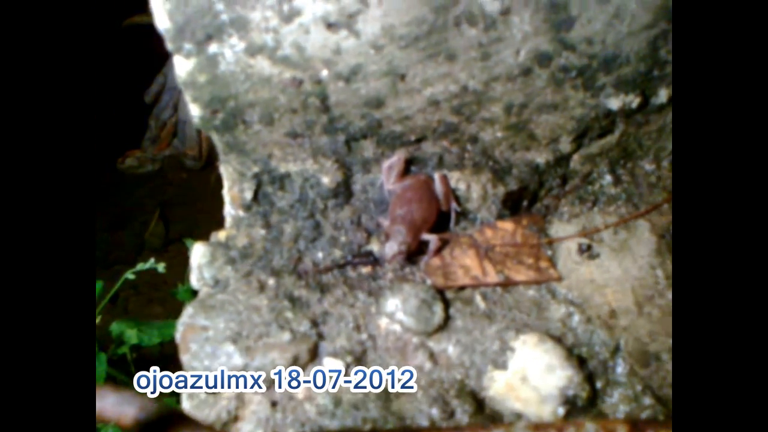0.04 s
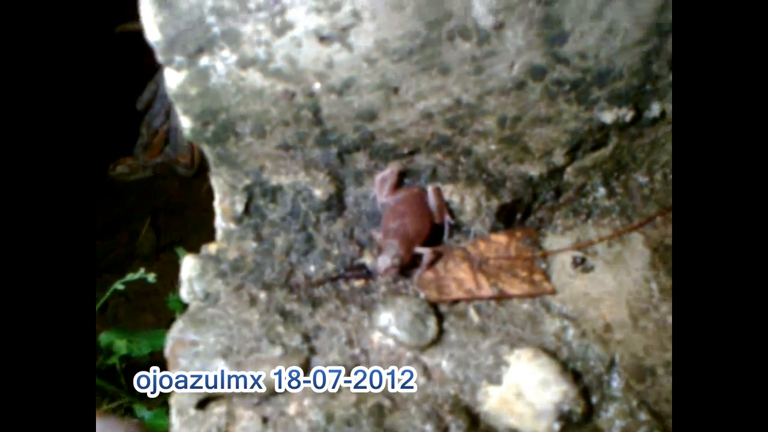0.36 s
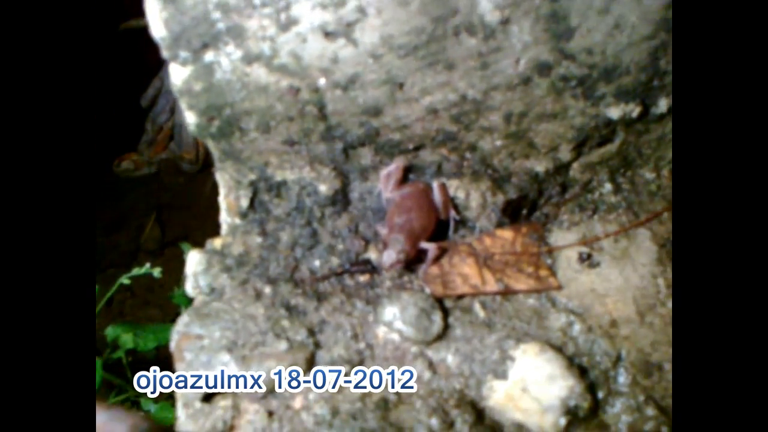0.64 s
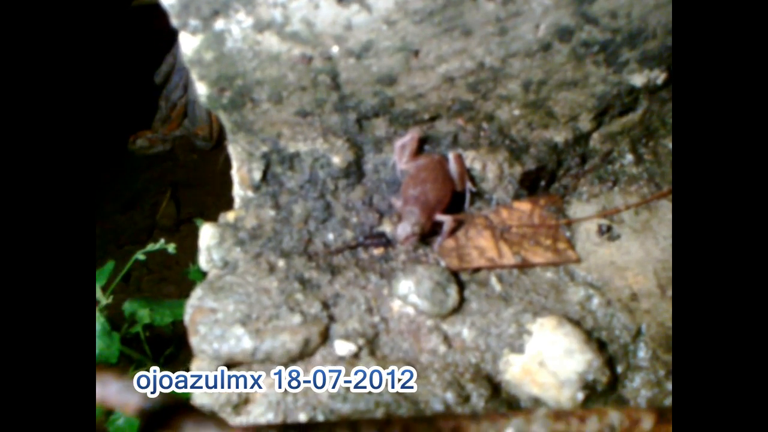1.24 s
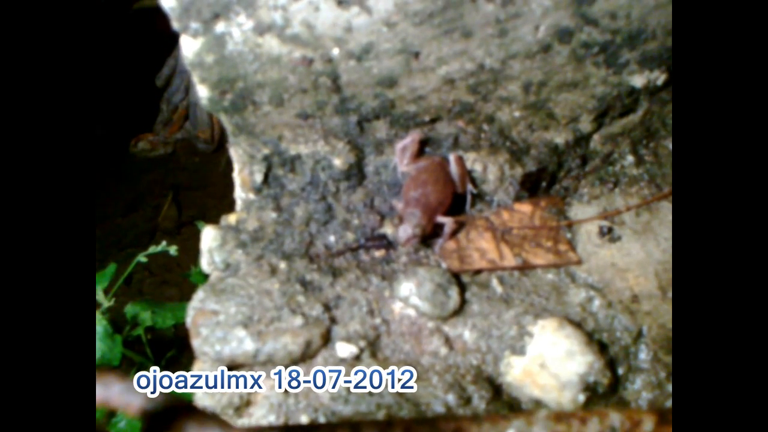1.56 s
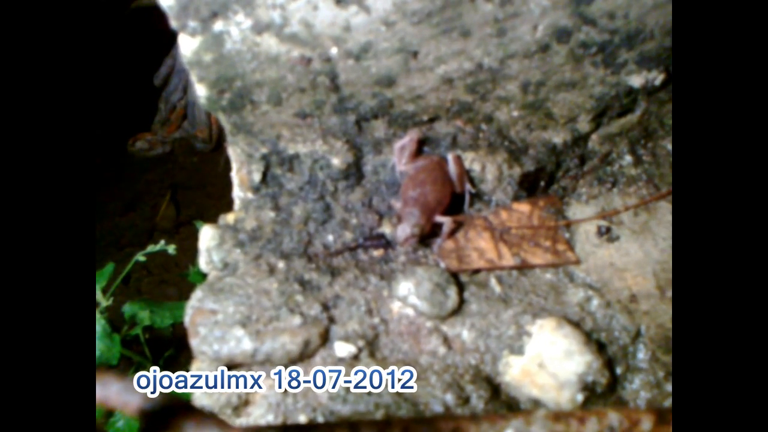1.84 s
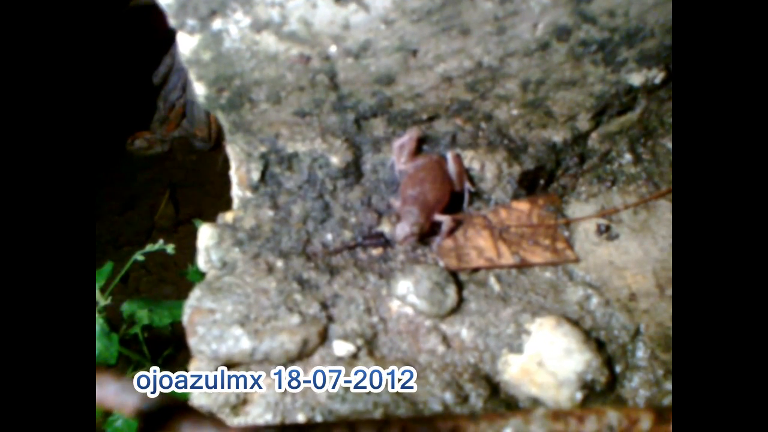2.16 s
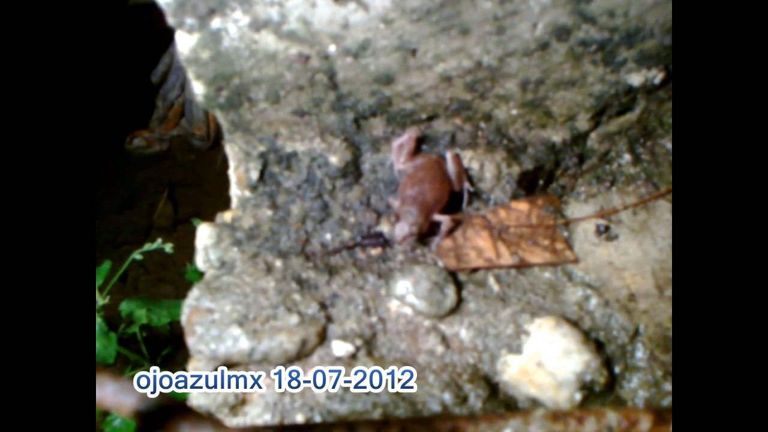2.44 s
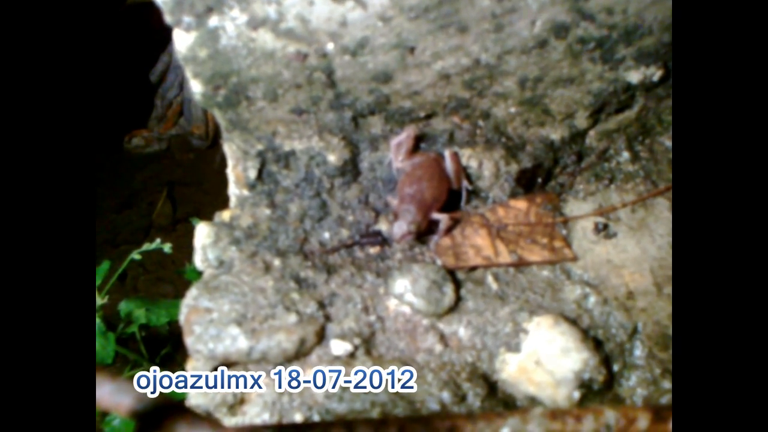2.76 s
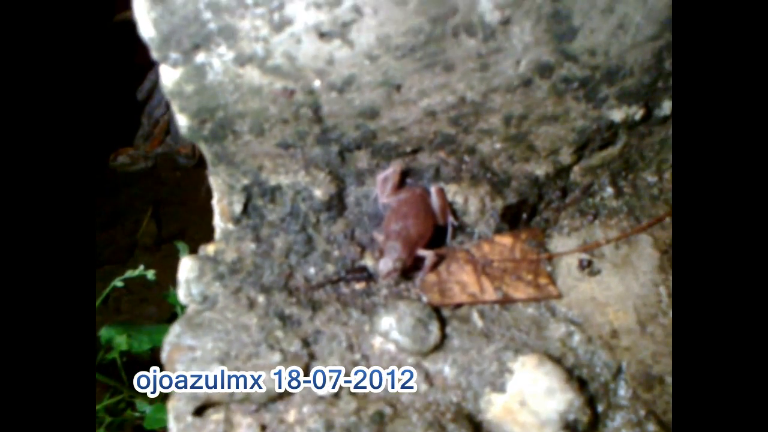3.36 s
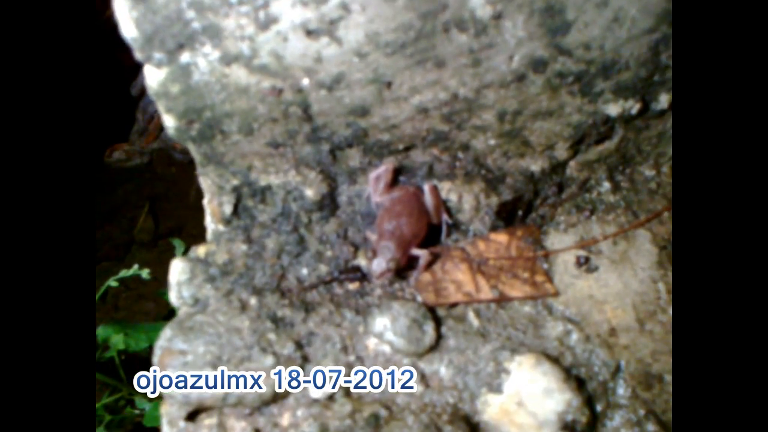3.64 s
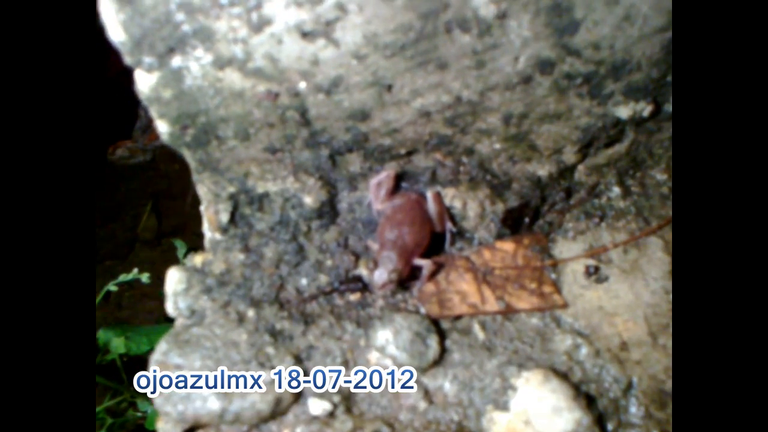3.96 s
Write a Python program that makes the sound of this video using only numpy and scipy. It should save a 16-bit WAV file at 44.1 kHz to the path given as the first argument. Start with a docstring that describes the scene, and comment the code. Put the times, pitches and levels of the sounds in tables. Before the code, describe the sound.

One soft rising frog whistle over a low night rumble, faint insect chirps and ticks.

```python
"""Outdoors among stone walls at night. A low rumble drifts under a faint hiss, and a brief low swell rises near
3.2 seconds, while a far insect chirps ten times a second. Close to the microphone come light rustles, dry ticks
and small hard taps that ring briefly. Late on, a frog gives one soft rising whistle that comes back off the
stone and dies away, and a soft bump nudges the microphone's case."""
import sys
import numpy as np
from scipy import signal
from scipy.fft import rfft, irfft
from scipy.io import wavfile

SR = 44100
rng = np.random.default_rng(int(sys.argv[2]) if len(sys.argv) > 2 else 0)


def pcm_store(signal):
    """Save signal as 16-bit PCM."""
    levels = np.round(np.clip(np.atleast_2d(signal), -1, 1) * 32767)
    wavfile.write(sys.argv[1], SR, levels.astype(np.int16).T)


N = 176400
T = np.arange(N) / SR


def from_db(db):
    """Decibels to gain."""
    return 10 ** (np.asarray(db) / 20)


def unit_rms(x):
    """Scale to an rms of one."""
    return x / np.sqrt(np.mean(x ** 2) + 1e-20)


def drift(rate_hz):
    """A smooth random wobble, mostly slower than rate_hz, with an rms of one."""
    f = np.arange(N // 2 + 1) * SR / N
    return unit_rms(irfft(rfft(rng.standard_normal(N)) / (1 + (f / rate_hz) ** 2), N))


def coloured_noise(spectrum):
    """Noise shaped by an EQ curve of (Hz, dB) points and rolled off past its ends, with an rms of one."""
    hz, db = np.transpose(spectrum)
    f = np.maximum(np.arange(N // 2 + 1) * SR / N, 1)
    curve = from_db(np.interp(np.log(f), np.log(hz), db))
    roll_off = np.minimum(f / hz[0], 1) ** 2 * np.minimum(hz[-1] / f, 1) ** 2
    return unit_rms(irfft(rfft(rng.standard_normal(N)) * curve * roll_off, N))


def swell(middle, length):
    """A rounded fade in and out."""
    return np.cos(np.pi * np.clip((T - middle) / length, -.5, .5))


def fade(start, decay):
    """A sudden onset and an exponential decay."""
    return (T >= start) * np.exp(-np.clip((T - start) / decay, 0, 100))


def filtered(x, hz, kind, order):
    """A low-, high- or band-pass filter."""
    return signal.sosfilt(signal.butter(order, hz, kind, fs=SR, output="sos"), x)


def ring(x, hz, t60):
    """One resonance: a unit click sets off a dying sine of height one."""
    radius, angle = from_db(-60 / (t60 * SR)), 2 * np.pi * hz / SR
    return signal.lfilter([0, np.sin(angle)], [1, -2 * radius * np.cos(angle), radius ** 2], x + 1e-18)


def reverb(x, t60, build_s=.0081):
    """The dense tail off stone and leaves; it builds up faster from close surfaces."""
    t = T[:SR]
    tail = rng.standard_normal(SR) * np.exp(-np.log(1000) * t / t60) * (1 - np.exp(-t / build_s))
    return signal.fftconvolve(x, tail / np.linalg.norm(tail))[:N]


# Fader rides for the rumble's three bands. Each row: time in seconds, level in dB before the trim.
DEEP_RIDE = [(0, -53), (.3, -54), (.7, -57), (1.05, -54.5), (1.6, -58), (2.02, -62.5), (2.15, -53),
             (2.7, -58), (3.12, -56.5), (3.2, -40), (3.32, -53), (3.7, -51.5), (4, -52.5)]
MIDDLE_RIDE = [(0, -63), (.12, -62), (.2, -53), (.44, -54), (.6, -55), (.7, -58), (1.3, -58), (1.4, -55),
               (1.8, -57.5), (2.33, -55.5), (2.45, -57), (3.09, -59), (3.17, -52), (3.28, -52), (3.42, -56),
               (3.62, -55.5), (3.9, -59), (4, -60.5)]
UPPER_RIDE = [(0, -64.5), (.2, -59.5), (.45, -61.5), (.6, -55.5), (.72, -61), (1.05, -63.5), (1.16, -60.5),
              (1.3, -65.5), (1.5, -56), (1.74, -64.5), (1.9, -61), (2.28, -64), (2.5, -70.5), (2.62, -62.5),
              (3.07, -67), (3.15, -56.5), (3.27, -50), (3.38, -62), (4, -64.5)]
# The tone of each band. Each row: frequency in Hz, relative level in dB.
DEEP_EQ = [(22, -10), (30, -5.5), (40, 5.5), (50, -8), (63, 2.5), (80, -1.5), (100, -17), (150, -15.5),
           (300, -53)]
MIDDLE_EQ = [(70, -7.5), (105, 0.5), (130, -1), (160, -8.5), (205, -13.5), (250, -21.5), (310, -26.5),
             (400, -26.5), (520, -35), (800, -54)]
UPPER_EQ = [(160, -9), (200, 3), (250, -3.5), (320, -7.5), (380, -17), (480, -35.5)]


def rumble():
    """A bed of low noise in three bands that drift apart, with a brief low swell near 3.2 seconds."""
    def band(ride, eq, trim_db):
        return from_db(np.interp(T, *np.transpose(ride)) + trim_db) * coloured_noise(eq)

    middle = band(MIDDLE_RIDE, MIDDLE_EQ, trim_db=4.5)
    deep = band(DEEP_RIDE, DEEP_EQ, trim_db=1.5)
    upper = band(UPPER_RIDE, UPPER_EQ, trim_db=.5)
    return deep + middle + upper


# The tone of the night's hiss. Each row: frequency in Hz, relative level in dB.
HISS_EQ = [(300, -0.5), (600, -1.5), (850, -1.5), (1100, -0.5), (1500, -2.5), (2200, 2), (2700, -1.5),
           (3300, -8.5), (4000, -10.5), (5000, -7), (6200, -6.5), (7000, -7), (8200, -10.5), (10000, -11.5),
           (12500, -15.5), (15500, -23.5)]


def hiss():
    """A faint, even hiss with a slight flicker in level."""
    level_db, flicker_db = -71.5, 1
    return from_db(level_db + flicker_db * drift(rate_hz=26)) * coloured_noise(HISS_EQ)


def insect():
    """An even pulse of high chirps, each sagging in pitch, blurred by distance."""
    first_s, period_s, chirp_s = .012, .0994, .068
    top_hz, fall_hz, waver_hz = 7504, 213.7, 170
    level_db, wander_db = -83.5, 1
    age = (T - first_s) % period_s
    progress = np.minimum(age / chirp_s, 1)
    pitch = top_hz - fall_hz * progress + waver_hz * drift(rate_hz=300)
    envelope = np.sin(np.pi * progress) ** 2 * from_db(wander_db * drift(rate_hz=1.9))
    chirps = envelope * np.sin(2 * np.pi * np.cumsum(pitch) / SR)
    return from_db(level_db) * unit_rms(chirps + from_db(1.5) * reverb(chirps, t60=.26))


# The tone the rustles share. Each row: frequency in Hz, relative level in dB.
RUSTLE_EQ = [(600, -2.5), (1100, 0), (2400, -3), (3800, -12), (7000, -15), (12000, -21.5), (15000, -28)]
# Faint rustles. Each row: midpoint in seconds, length in seconds, level in dB, tilt in dB per octave.
RUSTLES = [(0.17, 0.052, -73, 1), (0.458, 0.096, -71.5, 0.5), (0.631, 0.033, -69, 2),
           (1.787, 0.045, -72, 4), (3.265, 0.058, -75, 4.5), (3.606, 0.059, -71, 2)]


def rustles():
    """Short, grainy brushes of noise, some brighter than others."""
    grain = from_db(3.5 * drift(rate_hz=200))
    out = np.zeros(N)
    for middle, length, level_db, tilt in RUSTLES:
        eq = [(hz, db + tilt * np.log2(hz)) for hz, db in RUSTLE_EQ]
        out += from_db(level_db) * swell(middle, length) * unit_rms(coloured_noise(eq) * grain)
    return out


# Dry ticks. Each row: start in seconds, level in dB before the trim, centre in Hz, decay in seconds.
TICKS = [(0.538, -57, 2600, 0.0058), (0.661, -58, 6800, 0.0019), (1.7653, -51, 6400, 0.0028),
         (1.766, -55.5, 9900, .003), (1.941, -44, 10300, 0.00084), (2.447, -54.5, 6050, 0.0053),
         (2.522, -50, 11300, 0.0015), (2.577, -56, 10800, 0.0012), (2.722, -58, 2790, 0.0029),
         (3.094, -48.5, 10260, 0.00097), (3.544, -61, 8050, 0.0073), (3.804, -60.5, 2450, 0.0045),
         (3.91, -66, 8450, 0.0017), (3.915, -60, 12800, .003)]


def ticks():
    """Tiny crisp crackles, each a snap of noise through one broad resonance, with a short tail."""
    relative_width, attack_s, trim = .21, .00019, .52
    edge_ratio = 1 + relative_width / 2
    snaps = np.zeros(N)
    for start, level_db, hz, decay in TICKS:
        noise = filtered(rng.standard_normal(N), [hz / edge_ratio, hz * edge_ratio], "band", order=1)
        envelope = fade(start, decay) * (1 - fade(start, attack_s))
        snaps += trim * from_db(level_db) * envelope * unit_rms(noise)
    return filtered(snaps + from_db(-11.5) * reverb(snaps, t60=.21), 13000, "low", order=2)


# Small hard taps. Each row: start in seconds, strike level in dB, tilt in dB per octave.
TAPS = [(1.3813, -39, -3), (1.4108, -52.5, -1), (1.433, -52, -8), (1.7675, -52, -10.5), (2.449, -53, -3),
        (3.603, -54.5, 2), (3.909, -53.5, 2.5)]
# The modes they ring. Each row: frequency in Hz, relative level in dB, seconds to fall by 60 dB.
TAP_MODES = [(734, -18.5, 0.026), (1103, -8.5, 0.0091), (1475, -2, 0.0047), (1900, -11.5, 0.021),
             (2190, -11.5, 0.014), (3680, -20, 0.0092), (5700, -11.5, 0.0067)]


def taps():
    """Small hard contacts ring a few short modes and scatter off the stone."""
    tilt_pivot_hz = 1380
    knocks = np.zeros(N)
    for hz, mode_db, t60 in TAP_MODES:
        strikes = np.zeros(N)
        for start, strike_db, tilt in TAPS:
            strikes[int(start * SR)] = from_db(strike_db + mode_db + tilt * np.log2(hz / tilt_pivot_hz))
        knocks += ring(strikes, hz, t60)
    knocks = filtered(knocks, 670, "high", order=4)
    knocks = filtered(knocks, 6900, "low", order=4)
    return knocks + from_db(-10) * reverb(knocks, t60=.48)


# Short low drones. Each row: midpoint in seconds, length in seconds, pitch in Hz, level in dB.
DRONES = [(2.268, 0.18, 118.5, -49.5), (2.692, 0.13, 96, -44), (3.011, 0.2, 93.6, -49.5)]


def drones():
    """Pure low tones that surface briefly inside the rumble."""
    out = np.zeros(N)
    for middle, length, hz, level_db in DRONES:
        tone = np.sqrt(2) * np.sin(2 * np.pi * (hz * T + rng.random()))
        out += from_db(level_db) * swell(middle, length) * tone
    return out


# The shape of the frog's whistle. Each row: time in seconds, pitch in Hz, level in dB before the mix.
WHISTLE = [(2.784, 2480, -69), (2.806, 2590, -77), (2.823, 2694, -61.5), (2.838, 2870, -67),
           (2.853, 2970, -64.5), (2.870, 3112, -70.5), (2.888, 3110, -66.5), (2.905, 3240, -74)]
# Its slapback off the stone walls. Each row: delay in seconds, gain in dB.
WALL_ECHOES = [(.034, -9), (0.073, -4), (.138, -13)]


def frog():
    """One nearly pure rising whistle, with slapback off the walls and a diffuse tail."""
    waver_share, direct_db, tail_db = .019, -4, -1.5
    times, hz, db = np.transpose(WHISTLE)
    pitch = np.interp(T, times, hz) * (1 + waver_share * drift(rate_hz=160))
    envelope = np.interp(T, times, from_db(db), left=0, right=0)
    call = np.sqrt(2) * envelope * np.sin(2 * np.pi * np.cumsum(pitch) / SR)
    echoes = sum(from_db(gain_db) * np.roll(call, int(delay * SR)) for delay, gain_db in WALL_ECHOES)
    tail = reverb(call, t60=.58, build_s=.05)
    return from_db(direct_db) * call + echoes + from_db(tail_db) * tail


def bump():
    """One soft, dull push on the microphone's case."""
    push = -from_db(-41) * fade(start=3.3102, decay=.0018)
    return filtered(push, 1400, "low", order=2)


def scene():
    """The night bed, the close details and the frog, mixed in mono."""
    return (rumble() + hiss() + insect() + rustles() + ticks() + taps() + drones() + frog() + bump())[None]


def record(dry):
    """A steep low-pass takes off the very top."""
    cutoff_hz = 15700
    return signal.sosfilt(signal.ellip(12, .1, 80, cutoff_hz, fs=SR, output="sos"), dry)


dry = scene()
out = record(dry)
pcm_store(out)
```